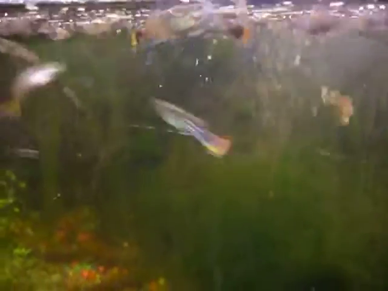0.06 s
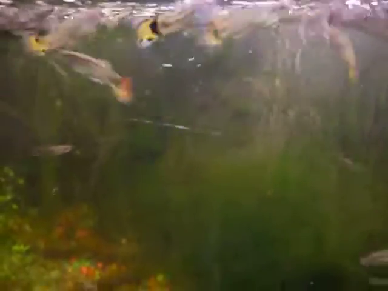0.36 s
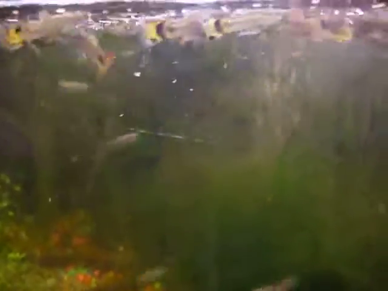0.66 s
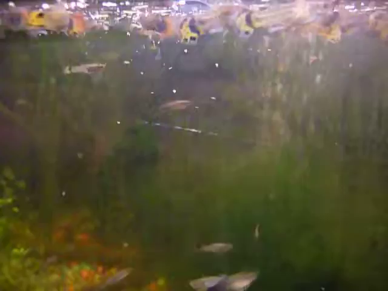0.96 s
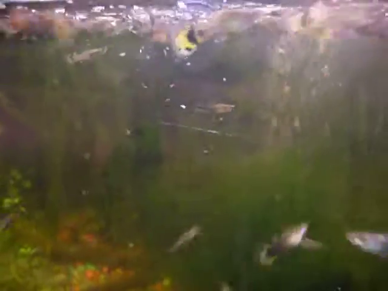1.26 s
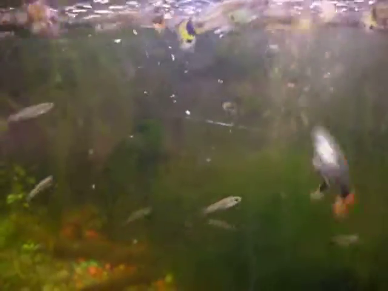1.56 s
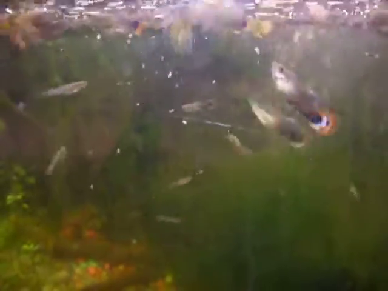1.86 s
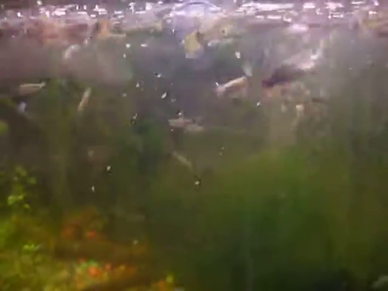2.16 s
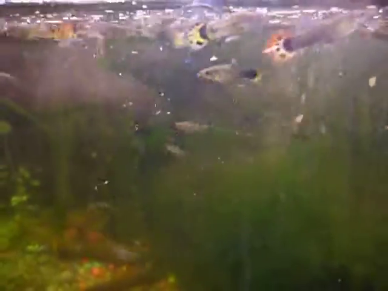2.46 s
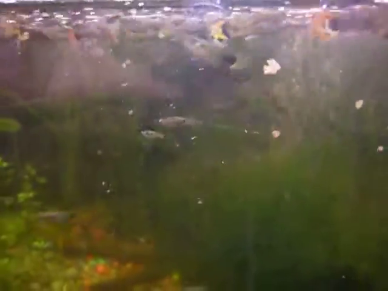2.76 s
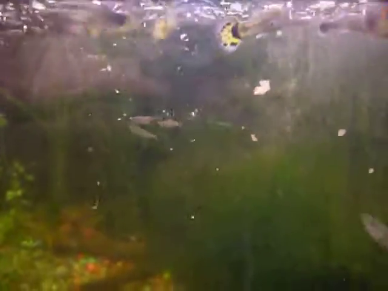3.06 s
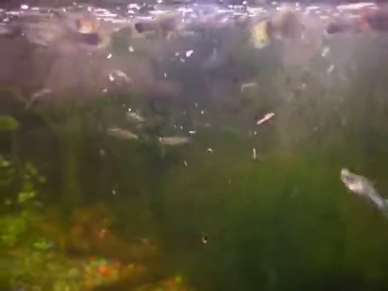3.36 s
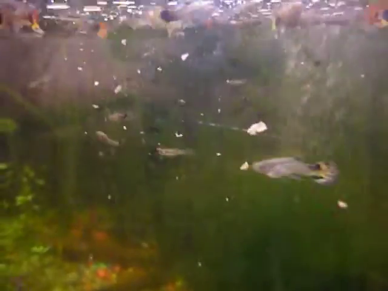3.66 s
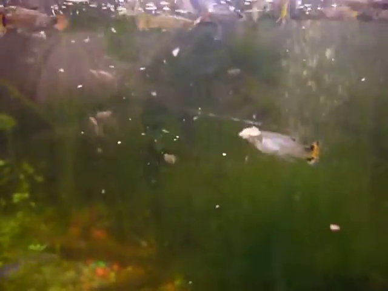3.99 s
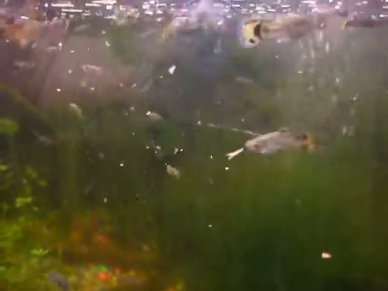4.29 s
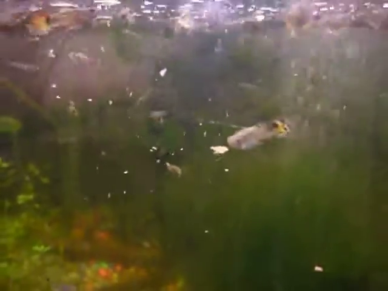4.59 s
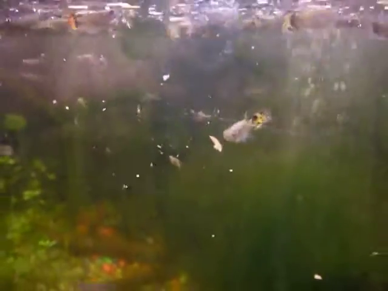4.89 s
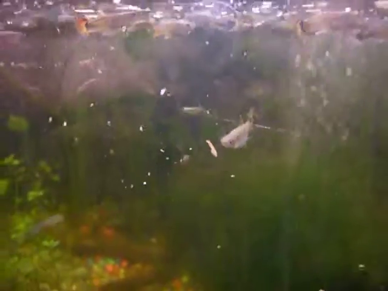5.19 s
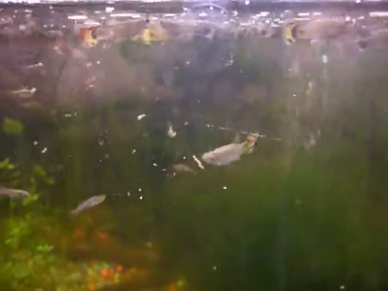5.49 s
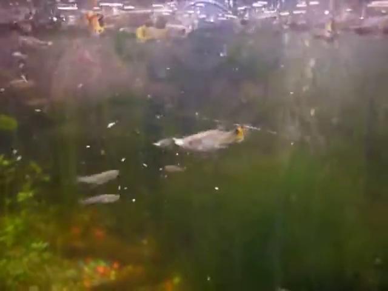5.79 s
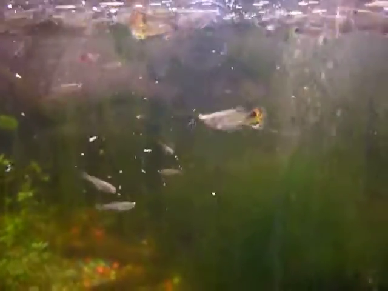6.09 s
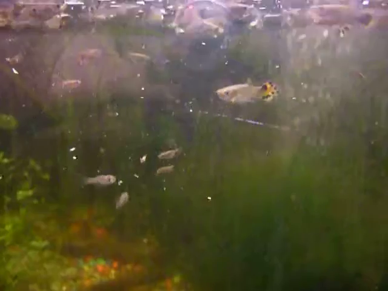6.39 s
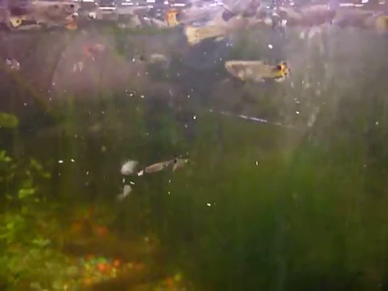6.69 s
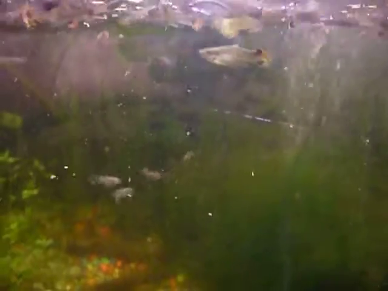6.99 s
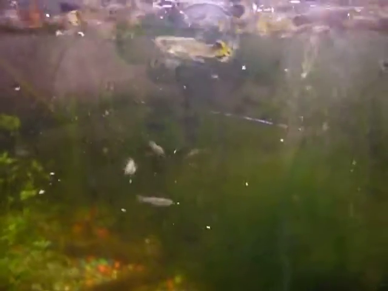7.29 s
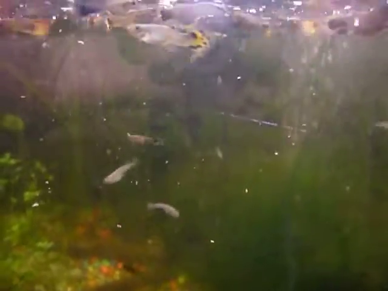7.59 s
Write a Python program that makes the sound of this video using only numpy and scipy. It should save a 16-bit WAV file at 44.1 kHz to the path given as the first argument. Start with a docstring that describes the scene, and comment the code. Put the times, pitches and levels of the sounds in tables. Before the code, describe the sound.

From the first moment to the end, about eight seconds later, an aquarium air pump hums low and evenly, with a very faint fast rattle. Over it, a rapid stream of bubbles gurgles through the fish tank, stirring the water into a soft, slightly hollow wash. Tiny bubbles burst at the surface in a continuous fine fizz, a little brighter during the first second.

Larger bubbles stand out as short, rounded plops of similar pitch, for example at about 1.5 and 3.1 seconds, in a cluster between 4.8 and 5.3, and near 5.9, 6.5, 6.8 and 7.7 seconds. Sharp little pops are scattered among them, the clearest around 1.6, 2, 2.6 and 3.6 seconds. The bubbling surges and eases slightly but never stops. The sound is close, in a small room with very little echo.

```python
"""Air pump and bubbles in a fish tank

In a small room a pump hums at harmonics of the mains, its armature rattling faintly on every stroke.
Each stroke frees a bubble that rings as a resonator of air and water, and large ones stand out as plops.
The rising stream stirs the water into a low wash and bursts at the surface in tiny ticks.
Resonances of the tank and its hood colour the wash and the fizz."""
import sys
import numpy as np
from scipy import signal
from scipy.fft import rfft, irfft
from scipy.io import wavfile

SR = 44100
rng = np.random.default_rng(int(sys.argv[2]) if len(sys.argv) > 2 else 0)


def dump_mix(stems):
    """Bounce the given channels to the path in sys.argv[1] as a 16-bit WAV at rate SR."""
    frames = np.atleast_2d(stems).T  # one column per channel
    limited = np.clip(frames, -1, 1)  # hard clip at full scale
    pcm = np.round(limited * 32767).astype(np.int16)
    wavfile.write(sys.argv[1], SR, pcm)


N = 346185
TIME = np.arange(N) / SR
MAINS_HZ = 49.99
STROKES_S = np.arange(0, N / SR, .5 / MAINS_HZ)  # two strokes per mains cycle

# large bubbles in the stream: time_s, relative_peak_db
LARGE_BUBBLES = [(0.4359, -36), (1.4616, -30), (1.8644, -35), (2.6167, -35), (3.133, -30.5), (3.182, -30),
                 (3.5417, -31), (3.797, -33), (4.7716, -34), (4.932, -27.5), (5.013, -32), (5.2614, -31),
                 (5.2917, -37), (5.3198, -30.5), (5.902, -29), (6.4692, -28.5), (6.8124, -27.5),
                 (7.674, -29)]
# spectral envelope of churning water: frequency_hz, relative_density_db
CHURN_SPECTRUM = [(25, -32), (60, -13), (110, -2.5), (170, -3), (300, 1), (450, -2), (750, -2.5),
                  (1200, -3), (1700, -5.5), (2400, -9.5), (3500, -14), (4500, -15), (6800, -17.5),
                  (8500, -34.5)]
# spectral envelope of short ticks: frequency_hz, relative_density_db
TICK_SPECTRUM = [(300, -3.5), (900, 0.5), (1700, -0.5), (2400, -6.5), (3400, 2.5), (4000, -6), (4400, -3.5),
                 (5500, -3.5), (6600, -3), (7100, -10.5), (7800, -15), (8600, -31.5)]


def gain_of(db):
    """Amplitude ratio: a factor of ten for every 20 dB."""
    return 10 ** (np.asarray(db) / 20)


def unit_rms(x):
    """Normalisation to a mean power of one."""
    return x / np.sqrt(np.mean(x ** 2) + 1e-20)


def add(mix, start_s, sound):
    """Superposition: a sound adds to the mix from its start time."""
    part = mix[max(round(start_s * SR), 0):][:len(sound)]
    part += sound[:len(part)]


def drift(cutoff_hz):
    """Random fluctuation: low-passed Gaussian noise of unit rms."""
    hz = np.fft.rfftfreq(N, 1 / SR)
    return unit_rms(irfft(rfft(rng.standard_normal(N)) / (1 + (hz / cutoff_hz) ** 4), N))


def air_flow(follow, wander_db):
    """Amplitude modulation: a gain that follows the air flow in part and wanders a little by itself."""
    # surges and lulls of the air flow: time_s, level_db
    surges = [(0.0, 0.7), (0.24, -0.9), (0.78, 0.5), (2.04, -0.3), (2.16, -3), (2.58, 1.8), (2.88, -2),
              (3.54, 2.7), (3.66, 0.4), (4.92, 0.5), (5.16, -2.4), (5.28, 2.1), (5.46, -0.9), (5.88, 2),
              (6.18, -0.5), (6.36, 0.7), (7.02, -0.5), (7.84, 0.8)]
    time_s, level_db = np.transpose(surges)
    return gain_of(follow * np.interp(TIME, time_s, level_db) + wander_db * drift(2.8))


def in_tank(x, spectrum, size=16384):
    """Resonance: a minimum-phase filter imposes the source's spectrum and the ringing of the tank."""
    # resonances and dips of the tank and its hood: centre_hz, width_hz, lift_db
    modes = [(164.6, 18, 13.5), (196, 16, 8.5), (222.6, 11, 12), (248, 39, 4.5), (554.3, 47, 6),
             (592.4, 25, 5.5), (649, 59, 3), (927, 94, 7), (1009, 30, 4), (1064, 33, -0.5),
             (1200, 200, 3.5), (1440, 39, 2), (1555, 71, 4), (2014, 37, 7.5), (2110, 38, 9), (2320, 51, -4),
             (2340, 52, 6.5), (2869, 52, 7.5), (3060, 38, -4), (3576, 550, 5.5), (3997, 220, 6),
             (4300, 90, -2.5), (5080, 180, 3.5), (5400, 180, -3), (6590, 310, 6.5)]
    hz = np.fft.rfftfreq(size, 1 / SR)
    knot_hz, knot_db = np.transpose(spectrum)
    source_db = np.interp(np.log(hz + 1), np.log(knot_hz), knot_db)
    modes_db = sum(lift / (1 + (2 * (hz - centre) / width) ** 2) for centre, width, lift in modes)
    cepstrum = irfft(np.log(gain_of(source_db + modes_db)))
    cepstrum[1:size // 2] *= 2  # folded forward, so that all ringing follows its cause
    cepstrum[size // 2 + 1:] = 0
    response = irfft(np.exp(rfft(cepstrum)))[:size // 2]
    return signal.oaconvolve(x, response)[:N]


def room(x, wet_db, t60_s, path_hz=1.3, size=16000, paths=3):
    """Reverberation: diffuse tails crossfade as the rippling surface sends sound along other paths."""
    t = np.arange(size) / SR
    tails = rng.standard_normal((paths, size)) * gain_of(-60 * t / t60_s) * (t > .004)
    tails /= np.linalg.norm(tails, axis=1, keepdims=True)
    phases = np.pi * np.arange(paths)[:, None] / paths
    shares = np.sqrt(2 / paths) * np.sin(2 * np.pi * path_hz * TIME + phases)
    wet = sum(signal.oaconvolve(x * share, tail)[:N] for share, tail in zip(shares, tails))
    return x + gain_of(wet_db) * wet


def pump_hum(gain_db, waver):
    """Forced vibration at harmonics of the mains, each wavering slightly with the back pressure."""
    # partials of the hum: harmonic_number, relative_level_db
    harmonics = [(1, -73), (2, -56.5), (3, -66), (4, -58.5), (5, -57.5), (6, -69.5), (7, -59.5), (8, -59),
                 (10, -62.5), (13, -63.5), (14, -69.5), (16, -66), (20, -68.5), (31, -68), (33, -71),
                 (35, -66.5), (36, -68), (49, -76.5)]
    out = np.zeros(N)
    for number, db in harmonics:
        amplitude = gain_of(db) * (1 + waver * drift(1.2))
        out += amplitude * np.sin(2 * np.pi * (number * MAINS_HZ * TIME + rng.random()))
    return gain_of(gain_db) * np.sqrt(2) * out


def armature_rattle(level_db, decay_s, roughness, band_hz, size=400):
    """Periodic impacts: the armature hits both ends of its travel, each with a nearly repeating tick."""
    out = np.zeros(N)
    envelope = np.exp(-np.arange(size) / SR / decay_s)
    ends = rng.standard_normal((2, size))
    for k, stroke_s in enumerate(STROKES_S):
        add(out, stroke_s + .0007, envelope * (ends[k % 2] + roughness * rng.standard_normal(size)))
    housing = signal.butter(2, band_hz, "band", fs=SR, output="sos")
    return gain_of(level_db) * unit_rms(in_tank(signal.sosfilt(housing, out), TICK_SPECTRUM))


def churn(level_db, flutter_db):
    """Flow noise: the rising column stirs the water into a fluttering wash whose bass swells and ebbs."""
    stir = rng.standard_normal(N) * gain_of(flutter_db * drift(49))
    bass = signal.sosfilt(signal.butter(1, 300, fs=SR, output="sos"), stir)
    stir += bass * (air_flow(follow=.2, wander_db=.55) - 1)
    return gain_of(level_db) * unit_rms(in_tank(stir, CHURN_SPECTRUM))


def gulps(gain_db, half_length_s):
    """Low-frequency oscillation: the water heaves in soft, randomly modulated swells."""
    # deep heaves of the water: centre_s, relative_level_db, pitch_hz
    heaves = [(2.7, -51, 92.4), (4.2, -56, 74), (5.29, -74, 72)]
    swells = sum(gain_of(db) * np.exp(-((TIME - s) / half_length_s) ** 2) * np.sin(2 * np.pi * hz * TIME)
                 for s, db, hz in heaves)
    return gain_of(gain_db) * np.sqrt(2) * drift(14) * swells


def bubble_ring(hz, swell_s, t60_s, rise, size=2200):
    """Minnaert resonance: a bubble's tone swells, decays and climbs a little as it nears the surface."""
    t = np.arange(size) / SR
    envelope = (1 - np.exp(-(t / swell_s) ** 3)) * gain_of(-60 * t / t60_s)
    pitch_hz = hz * (1 + rise * (t - swell_s) / t60_s)
    return envelope / envelope.max() * np.sin(2 * np.pi * np.cumsum(pitch_hz) / SR)


def gurgle(level_db, low_hz, high_hz, cycles, range_db, count=420):
    """Constant-Q damping: merged bubbles of mixed sizes blip, the larger ones lower and longer."""
    out = np.zeros(N)
    for when, place, strength in rng.random((count, 3)):
        hz = low_hz * (high_hz / low_hz) ** place
        blip = bubble_ring(hz, swell_s=1 / hz, t60_s=cycles / hz, rise=.064)
        add(out, when * N / SR, gain_of(range_db * strength) * blip)
    return gain_of(level_db) * unit_rms(in_tank(out, CHURN_SPECTRUM))


def film_tick(hz, decay_s, splash, size=500):
    """Impulse response of a bursting film: a very short ring and a puff of spray, of peak one."""
    t = np.arange(size) / SR
    burst = (np.sin(2 * np.pi * hz * t) + splash * rng.standard_normal(size)) * np.exp(-t / decay_s)
    return burst / abs(burst).max()


def fizz(level_db, per_s, band_hz, decay_s, splash, scatter_db=4):
    """Shot noise: small bubbles of many sizes burst at the surface at random times."""
    out = np.zeros(N)
    for _ in range(int(per_s * N / SR)):
        strength = gain_of(scatter_db * min(rng.standard_normal(), 1.8))
        add(out, rng.uniform(0, N / SR), strength * film_tick(rng.uniform(*band_hz), decay_s, splash))
    return gain_of(level_db) * unit_rms(in_tank(out, TICK_SPECTRUM))


def spray_envelope(fade_db_per_s):
    """Amplitude envelope of the fine spray: a slow exponential fade with a few flurries."""
    # flurries of spray at the surface: centre_s, half_length_s, lift_db
    flurries = [(0.17, 0.1, 6.5), (0.68, 0.15, 5), (3.44, 0.16, 2.5)]
    lift_db = sum(db * np.exp(-((TIME - s) / half_length) ** 2) for s, half_length, db in flurries)
    return gain_of(lift_db - fade_db_per_s * (TIME - TIME.mean()))


def surface_pops(gain_db, decay_s, splash):
    """Film rupture: the sharpest bursts at the surface, low-passed by the hood."""
    # loudest bursts: start_s, relative_peak_db, pitch_hz
    bursts = [(0.7312, -32, 3560), (1.6402, -26, 3670), (2.0163, -23.5, 6400), (2.3007, -30.5, 3620),
              (2.587, -25, 2960), (3.1697, -29, 3240), (3.5588, -27, 3520), (4.1979, -31, 3940),
              (4.6558, -32, 3300), (5.2909, -31, 3370), (5.4909, -31, 3820), (6.0511, -32, 3880),
              (7.2709, -30, 3250)]
    out = np.zeros(N)
    for start_s, db, hz in bursts:
        add(out, start_s, gain_of(db + gain_db) * film_tick(hz, decay_s, splash))
    return signal.sosfilt(signal.butter(8, 7100, fs=SR, output="sos"), out)


def under_hood(x):
    """Band-pass filtering: the air gap under the hood passes a narrow band, which rounds each plop."""
    return signal.sosfilt(signal.butter(5, [1140, 1328], "band", fs=SR, output="sos"), x)


def air_left(half_length_s):
    """Conservation of air: a large bubble takes its neighbours' share, so the stream thins briefly."""
    return 1 - .7 * sum(np.exp(-((TIME - s - .004) / half_length_s) ** 2) for s, _ in LARGE_BUBBLES)


def bubble_stream(gain_db, hz, spread, scatter_db, lag_s, jitter_s, push_db, burst_db):
    """Periodic excitation: each stroke frees a bubble that rings, nudges the water and spits."""
    tones, pushes, bursts = np.zeros((3, N))
    puff = signal.windows.hann(260)
    spit = np.exp(-np.arange(260) / 28)
    for stroke_s in STROKES_S:
        size, late, burst = rng.standard_normal(3)
        detune, polarity = rng.uniform(-1, 1, 2)
        start_s = stroke_s + lag_s + jitter_s * late
        strength = gain_of(scatter_db * min(size, .8))
        spit_strength = strength * gain_of(4.5 * min(burst, 1.5))
        tone = bubble_ring(hz * (1 + spread * detune), swell_s=.003, t60_s=.015, rise=.028)
        add(tones, start_s, np.sign(polarity) * strength * tone)
        add(pushes, start_s + .005, strength * puff * rng.standard_normal(len(puff)))
        add(bursts, start_s + .005, spit_strength * spit * rng.standard_normal(len(spit)))
    plops = unit_rms(under_hood(tones)) * air_left(half_length_s=.0057)
    splash = gain_of(push_db) * unit_rms(in_tank(pushes, CHURN_SPECTRUM))
    splash += gain_of(burst_db) * unit_rms(in_tank(bursts, TICK_SPECTRUM))
    return gain_of(gain_db) * (plops + splash) * air_flow(follow=.8, wander_db=.2)


def large_bubbles(gain_db, hz, spread):
    """Free oscillation: large bubbles of nearly one size swell more slowly and stand out of the stream."""
    out = np.zeros(N)
    for time_s, db in LARGE_BUBBLES:
        tone = bubble_ring(hz * (1 + spread * rng.uniform(-1, 1)), swell_s=.0048, t60_s=.03, rise=.03)
        add(out, time_s - .0025, gain_of(db) * tone)
    return gain_of(gain_db) * out


def scene():
    """Superposition of pump, wash and bubbles; the bubbles also reverberate in the room."""
    pump = pump_hum(gain_db=1, waver=.1)
    pump += armature_rattle(level_db=-62.5, decay_s=.0013, roughness=.6, band_hz=(1400, 6950))
    wash = churn(level_db=-44, flutter_db=.5) + gulps(gain_db=.5, half_length_s=.038)
    bubbles = gurgle(level_db=-55.5, low_hz=430, high_hz=1073, cycles=14, range_db=5.5)
    coarse = fizz(level_db=-51.5, per_s=420, band_hz=(1400, 4495), decay_s=.00074, splash=.61)
    fine = fizz(level_db=-56, per_s=300, band_hz=(4640, 8550), decay_s=.00085, splash=.46)
    bubbles += coarse * air_flow(follow=.97, wander_db=.1)
    bubbles += fine * air_flow(follow=.4, wander_db=.1) * spray_envelope(fade_db_per_s=.14)
    bubbles += surface_pops(gain_db=.2, decay_s=.0009, splash=.31)
    bubbles += bubble_stream(gain_db=-44.5, hz=1245, spread=.034, scatter_db=4,
                             lag_s=.0058, jitter_s=.0023, push_db=-6, burst_db=-10)
    bubbles += large_bubbles(gain_db=-.5, hz=1230, spread=.039)
    return (room(bubbles, wet_db=-9, t60_s=.11) + pump + wash)[None]


def record(dry, cutoff_hz=8680, offset=-.0504):
    """Band limiting: a steep low-pass removes the top treble, and a constant offset is added."""
    lowpass = signal.firwin(301, cutoff_hz, window=("kaiser", 9), fs=SR)
    return signal.oaconvolve(dry, lowpass[None], "same") + offset


dry = scene()
out = record(dry)
dump_mix(out)
```